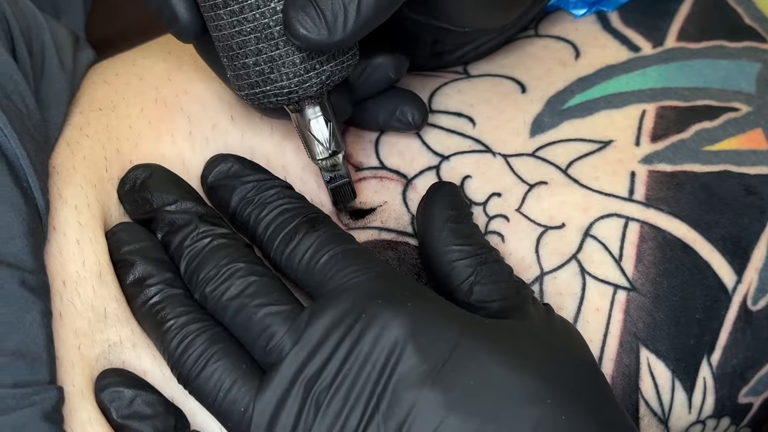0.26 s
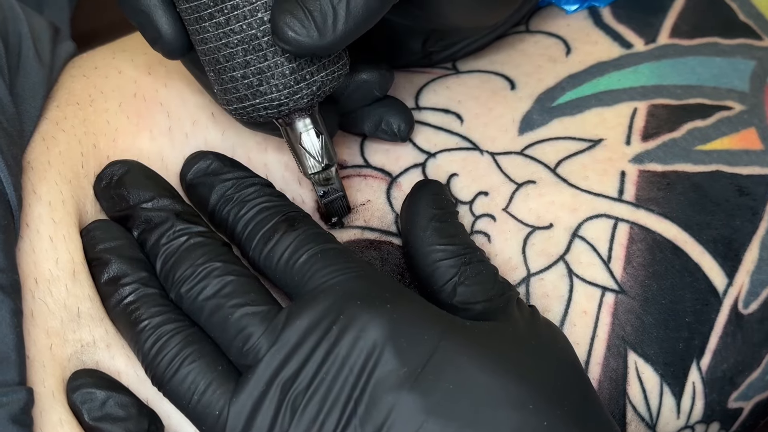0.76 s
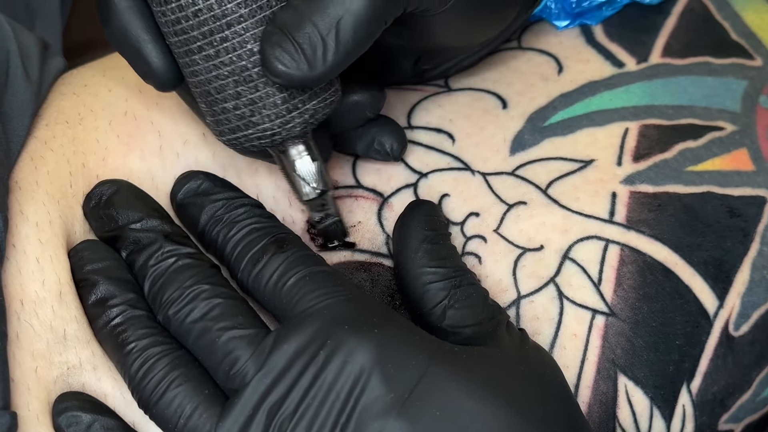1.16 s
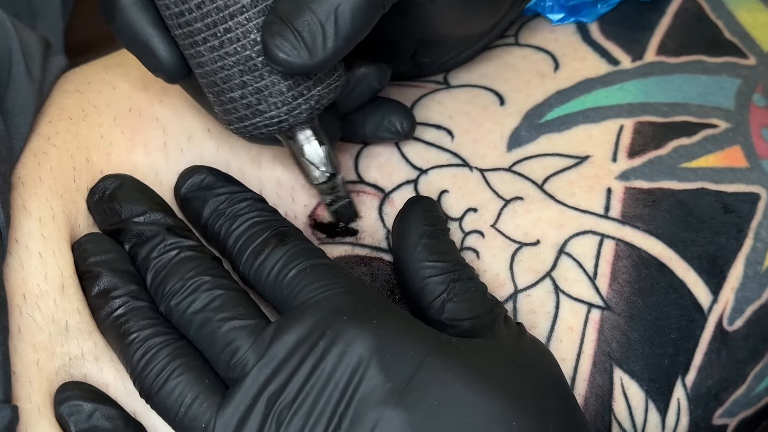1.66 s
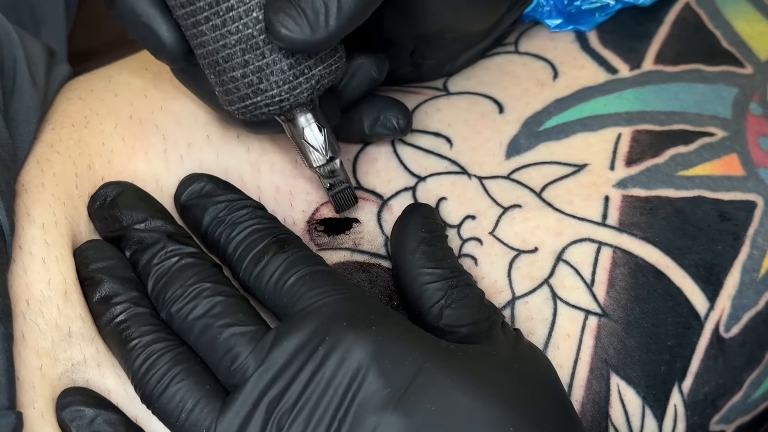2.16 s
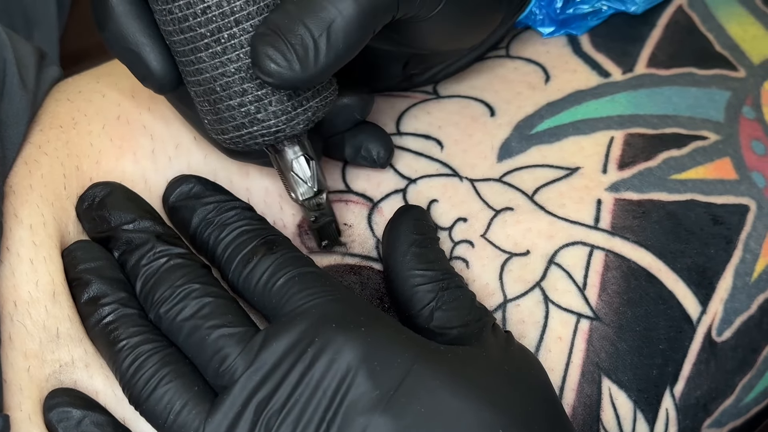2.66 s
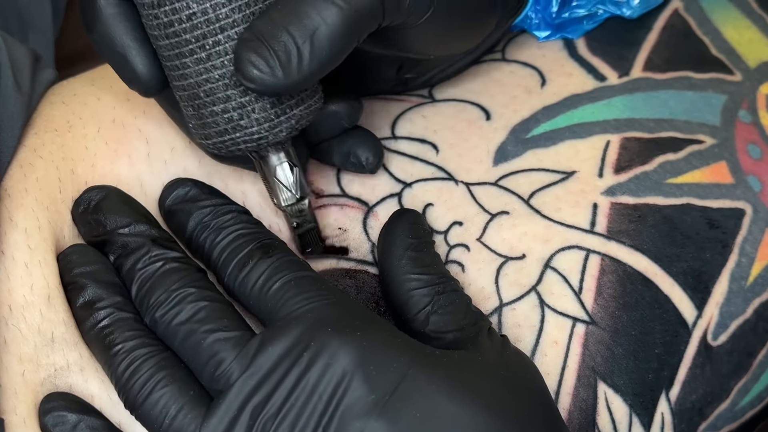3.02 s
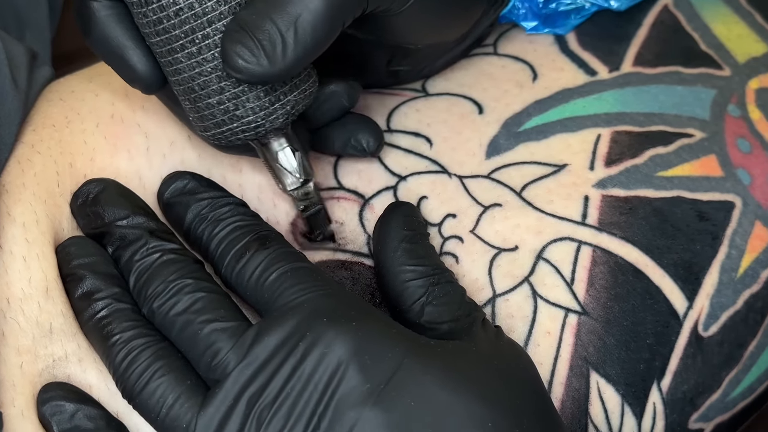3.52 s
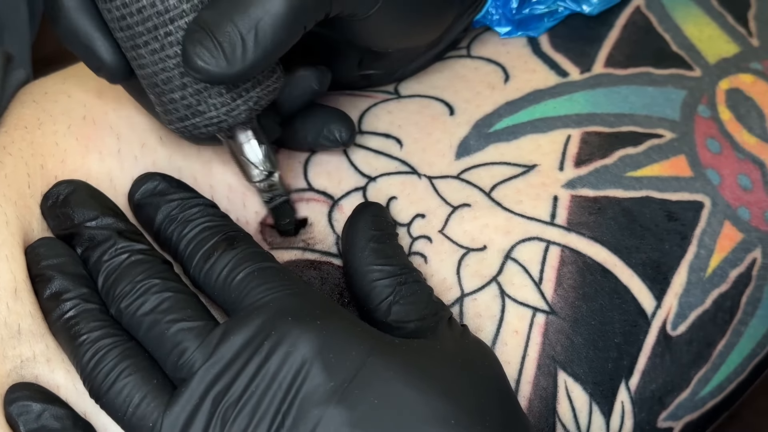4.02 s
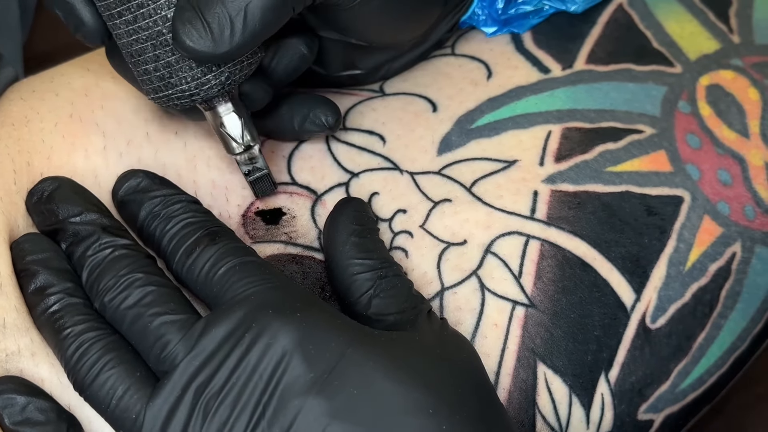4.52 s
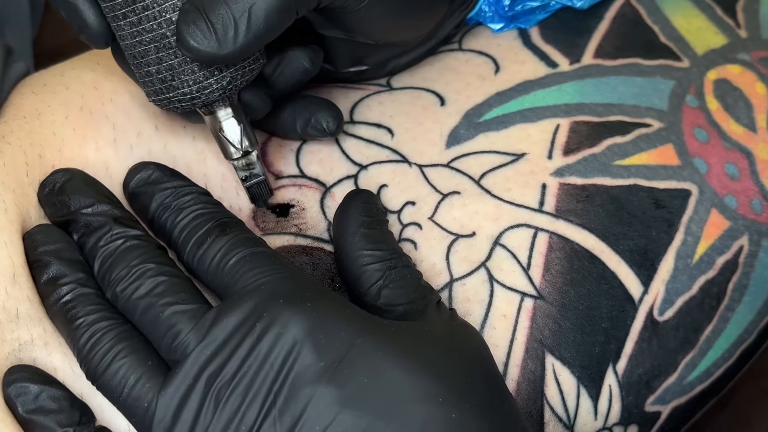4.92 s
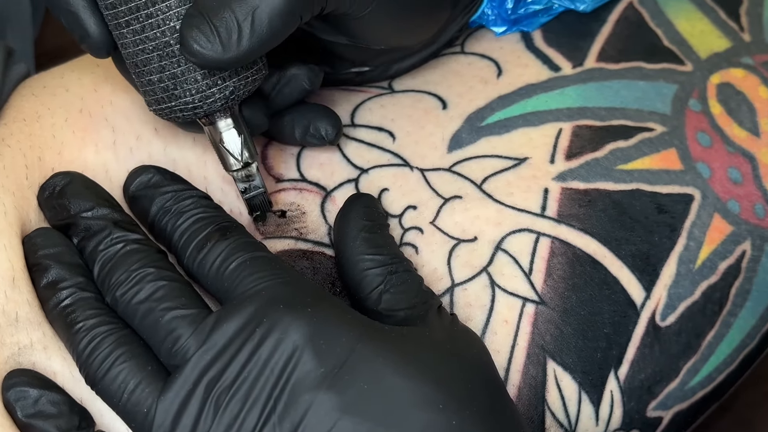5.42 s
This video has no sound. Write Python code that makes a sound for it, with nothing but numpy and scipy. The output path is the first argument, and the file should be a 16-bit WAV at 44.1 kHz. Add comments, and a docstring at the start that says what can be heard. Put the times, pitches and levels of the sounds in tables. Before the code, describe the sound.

A small rotary tattoo machine runs without pause, heard close and dry through a two-port stereo microphone in a quiet studio. Its rough drone repeats about 77 times a second, mixing nasal motor hum, metallic ringing chatter, dull knocks, a worn rub and bright bearing hiss. From 0 to 2 seconds the needles work the skin, the pitch wavering slightly with quick hand strokes and slowly sagging. Around 2.1 to 2.4 seconds the needles lift and the motor runs freer, a little higher and more open. It presses again until about 4.1, with one tiny sharp tick near 3.0. Another lift follows, then from about 4.55 it works to the end, steadier and tighter, at about 5.7. Farther off, a second machine buzzes thinly at a slightly higher, nearly even speed, fading after the start and swelling toward 4.3 seconds. Low room rumble and faint air lie underneath; the extreme treble is cut off.

```python
"""A rotary tattoo machine buzzes close to a two-port microphone in a quiet studio.
Its motor turns a cam about 77 times a second, slowing as the needles press into skin, running free when lifted.
Each turn repeats a hum of partials, ringing contacts, dull knocks and a worn rub, over bearing hiss.
Further off a second machine buzzes at a nearly even speed, swelling and fading, above the room's rumble."""
import sys
import numpy as np
from scipy import signal
from scipy.fft import rfft, irfft, next_fast_len
from scipy.io import wavfile
from scipy.ndimage import uniform_filter1d

SR = 44100
rng = np.random.default_rng(int(sys.argv[2]) if len(sys.argv) > 2 else 0)


def store_wav(level_fs):
    """Save 16-bit WAV to argv[1]."""
    pcm = np.round(np.clip(np.atleast_2d(level_fs), -1, 1) * 32767)
    wavfile.write(sys.argv[1], SR, pcm.T.astype(np.int16))


N = 250564   # length in samples

# Moments as shares of a turn: end of stroke, rebound, top of stroke, cartridge spring, approach
STRIKE, REBOUND, TOP, SPRING, APPROACH = .0, .15, .46, .69, .88

# Levels in the tables are relative unless marked otherwise; density_db is level per Hz.
# Room air and rumble: hz, density_db
ROOM_COLOUR = [(25, -11), (60, 0.5), (110, -1.5), (170, 3), (300, -1), (450, -6.5), (800, -4.5), (1400, -5),
               (2500, -11.5), (4000, -63)]
# Speed of the second machine: time_s, turns_per_s
NEIGHBOUR_SPEED = [(0, 87.66), (1.9, 87.69), (2.1, 87.56), (2.6, 87.6), (2.75, 87.875), (4.3, 87.865),
                   (4.6, 87.77), (5.68, 87.73)]
# Its buzz: time_s, buzz_db
NEIGHBOUR_BUZZ = [(0, -35), (.5, -49), (1.9, -46.5), (2.6, -40.5), (2.75, -38), (4.3, -33.5), (5.68, -39)]
# Its clear tones: multiple of the turn rate, level_db
NEIGHBOUR_PARTIALS = [(1, -54), (7, -65), (13, -84), (15, -65), (27, -65), (44, -54), (65, -70), (68, -48),
                      (80, -64), (124, -43)]
# Colour of its buzz: hz, density_db
BUZZ_COLOUR = [(1200, -40), (2500, -14), (4500, 1.5), (6000, 0.5), (8500, -0.5), (10800, -9), (13000, -4),
               (15800, 0)]
# How loud the near machine's parts arrive as the hand turns:
# time_s, hum_db, housing_rattle_db, cartridge_rattle_db, rasp_db
PART_LEVELS = [(0, -42.5, -40, -42, -47), (.3, -40, -38, -38.5, -55), (.65, -41.5, -36.5, -39.5, -63),
               (1.0, -41.5, -35.5, -39.5, -51), (1.5, -40, -36.5, -43, -45), (2.0, -41, -37.5, -45.5, -40),
               (2.2, -43.5, -38, -42, -36), (2.4, -42, -37, -46, -55), (2.67, -40.5, -36.5, -41, -64),
               (3.2, -40.5, -38.5, -43.5, -56), (3.95, -41, -40, -45, -43), (4.12, -41, -39.5, -51, -40),
               (4.25, -43.5, -39, -43, -37), (4.42, -42.5, -40.5, -52, -37), (4.6, -42, -40, -45, -42),
               (5.1, -40.5, -40.5, -42.5, -50), (5.68, -42.5, -37.5, -43, -43)]
# Hum of motor and grip when pressing: multiple of the turn rate, level_db
PRESSED_PARTIALS = [(1, -6.5), (2, -6.5), (3, -8.5), (4, -23), (5, -18.5), (6, -20.5), (7, -14.5),
                    (8, -12.5), (9, -3), (10, -8), (11, -9.5), (12, -20.5), (13, -17.5), (14, -37),
                    (15, -6), (16, -19.5), (17, -4.5), (18, -12.5), (19, -8), (20, 7.5), (21, -2), (22, -8),
                    (23, -2), (24, -11.5), (25, -14.5), (26, -18), (27, -4.5), (28, -24), (29, -5),
                    (30, -31), (31, -6), (32, -15), (33, -10.5), (34, -37), (35, -5.5)]
# Hum of motor and grip when lifted: multiple of the turn rate, level_db
FREE_PARTIALS = [(1, -8.5), (2, -6.5), (3, -6.5), (4, -26), (5, -20), (6, -16), (7, -15), (8, -11), (9, -8),
                 (10, -14.5), (11, -8.5), (12, -22), (13, -17), (14, -32), (15, -5), (16, -15), (17, 0),
                 (18, -2.5), (19, -30), (20, -3), (21, -14), (22, 2), (23, -1), (24, -14), (25, -29),
                 (26, -7), (27, -4.5), (28, -17), (29, -6.5), (30, -19), (31, -10), (32, -27), (33, -20),
                 (34, -28), (35, -37)]
# Partials that change as the hand bears down harder: {multiple: db per Hz of further slowing}
HARD_PRESS_CHANGE = {19: -4.4, 20: -0.79, 22: 5.1, 24: 5.4, 25: 7.6, 27: -2.5, 28: 1.2, 31: 1.2}
# Partials that change with the new grip angle while pressing: {multiple: change_db}
TILTED_GRIP_CHANGE = {19: -3.0, 20: -7.0, 21: 1.0, 22: 3.0, 23: 3.0}
# Contacts of cam, bar and needles in a turn: share_of_turn, lifted_db, pressed_db
DRIVE_CONTACTS = [(.0, -1.5, 3), (0.081, 3.5, 1), (0.169, 0, 4), (.4, 0.5, 2), (.5, 0.5, 2.5),
                  (0.581, 6, -32), (0.682, -1.5, -5), (0.809, 2.5, -0.5), (.87, 3, 7.5)]
# Resonances of housing and cartridge that the contacts ring: hz, width_hz, lifted_db, pressed_db
BODY_RESONANCES = [(3440, 420, -5.5, -18.5), (4170, 250, -5, -39), (4390, 142, -1.5, 0), (4603, 93, 1, 1),
                   (5100, 270, -2, -6), (6074, 150, -3, -4.5), (6850, 120, -1.5, 0.5), (6854, 80, 7, -7),
                   (9220, 126, 3, -5)]
# Blows on grip and cartridge: hz, width_hz, moment (share of a turn), lifted_db, pressed_db
BLOWS = [(1743, 232, STRIKE, -14.5, -12.5), (3070, 580, STRIKE, -5.5, -4.5),
         (3790, 617, APPROACH, -3, -15.5), (3530, 536, REBOUND, -8, -3), (4000, 494, APPROACH, -3, -11),
         (2405, 508, STRIKE, -20, -11.5), (5580, 900, TOP, -19, -9.5), (6800, 397.4, SPRING, 0, -3)]
# Bearing and needle friction: hz, density_db
HISS_COLOUR = [(700, -28), (1200, -18.5), (1700, 1), (2650, -6), (3150, -2.5), (3800, -5.5), (4550, 1.5),
               (5500, -1.5), (6800, -1.5), (7600, -4), (9400, -12.5), (10800, 2), (12500, -5.5),
               (15800, -18)]
# The rub that repeats every turn: hz, density_db
RUB_COLOUR = [(1500, -26), (2650, -13), (3100, -9), (3800, -24), (4150, -11.5), (4400, -3), (4620, 4),
              (4850, -5.5), (5600, -10), (6800, -3), (7600, -10), (9500, -6), (12000, -17), (15800, -7)]
# Swells of rattle and friction: low_hz, high_hz, burst over the steady part (ratio), moments (shares of a turn)
BURST_BANDS = [(0, 2800, .6, [STRIKE, TOP]), (2800, 3500, .5, [STRIKE]), (3500, 4200, .8, [APPROACH, TOP]),
               (4200, 4900, .5, [REBOUND, TOP]), (4900, 6300, 1.3, [TOP]), (6300, 7700, 1.2, [SPRING]),
               (7700, 9000, .8, [REBOUND + .1, APPROACH - .08]), (9000, 10200, 1.0, [SPRING]),
               (10200, 23000, 1.0, [STRIKE])]
# Sharper snaps of the needle bar: start_s, burst_peak_db (before its ring is added)
SNAPS = [(2.9725, -18)]
# Passes over the skin: touch_s, lift_s, mean speed at touch_hz, at lift_hz,
# swing of the speed with each sweep at touch_hz, at lift_hz
NEEDLE_PASSES = [(-.2, 2.046, 77.8, 75.8, .25, .36), (2.396, 4.098, 76.86, 75.66, .31, .53),
                 (4.547, 5.9, 77.5, 77.1, .22, .12)]
# The hand's to-and-fro, pushing hardest at whole counts: time_s, sweeps so far
HAND_SWEEPS = [(-.108, -1), (.246, 0), (.724, 2), (.865, 3), (2.034, 9), (2.672, 12), (3.97, 18),
               (4.629, 21), (4.829, 22), (5.28, 24), (5.56, 25), (5.84, 26)]
# How unsteadily the drive runs: time_s, looseness 0-1
LOOSENESS = [(0, .8), (2.1, 1), (2.45, 1), (2.6, .55), (4.1, .5), (4.2, 0), (5.68, .05)]
# Phase between the ports: hz, left lead in half turns of phase
PORT_LEAD = [(0, 0), (400, .08), (950, .05), (1250, .1), (1500, .7), (1800, .1), (2400, .05), (3000, .23),
             (3400, .2), (3600, 0), (6200, 0), (6900, .25), (7350, 1), (7600, 1), (8000, 1.87), (8300, 2),
             (8800, 1.97), (9100, 1.75), (10100, 1.25), (10500, 1), (11700, 1), (12300, .88), (12600, .58),
             (13200, .2), (13800, 0), (15000, 0), (15600, .1)]
# Level between the ports: hz, left_minus_right_db
PORT_TILT = [(100, -.5), (400, 0), (750, 2), (1250, 1.5), (1550, -7), (2000, -2.5), (2400, 0), (15000, 0)]

FREE_HZ, LIGHT_HZ, PRESSED_HZ = 78.9, 77.5, 76.3   # turns a second: lifted, needles fully in, working
SINK_S, LIFT_S = .107, .088   # time to sink in and to come clear
PUSH_HUM_DB, PUSH_HOUSING_DB, PUSH_CARTRIDGE_DB = -0.5, -0.2, -0.4   # change at the hardest push
TILT_S = 4.3   # the grip is held at a new angle from here on
LOW_SPREAD, HIGH_SPREAD = 1.45, .07   # phase of low and upper partials, radians per multiple squared
STUDIO_DB, HISS_DB, RUB_DB = -49.5, -38.5, -37   # base levels
HUM_DB, RATTLE_DB, KNOCK_DB, SCATTER_DB = -46.5, 31.5, 2.0, 3.5   # mix gains
RATTLE_SPREAD_DB, KNOCK_SPREAD_DB, HISS_FLICKER_DB = 2.2, 1.3, .9   # chance in contacts, blows and hiss
WOBBLE, LOOSE_HISS_DB = .0016, 2.0   # slip (share of a turn) at full looseness; hiss rise from tight to loose
CONTACT_JITTER, PATH_LAG = .0006, .01   # scale of the timing scatter, shares of a turn
RUB_SLIP, RUB_TURNS = .0008, 3.5   # slip against the cam (share of a turn); turns until the roughness is new
CARTRIDGE_HZ = 6300   # resonances above this belong to the cartridge
RASP_LOW_HZ, RASP_HIGH_HZ = 3400, 4200   # blows in this range follow the rasp
BURST_SHARP = 7.0   # larger is shorter
TICK_HZ, TICK_WIDTH_HZ, TICK_DECAY_S, TICK_RING_DB = 12300, 290, 0.001, 19
CUTOFF_HZ = 15780


def from_db(db):
    """Turns decibels into an amplitude factor."""
    return 10 ** (np.asarray(db) / 20)


def rms_one(x):
    """Scales a signal to rms 1."""
    return x / np.sqrt(np.mean(x ** 2) + 1e-20)


def at_hz(points, hz):
    """Reads a curve over pitch on a log-frequency axis."""
    p = np.array(points, float)
    return np.interp(np.log(hz + 1), np.log(p[:, 0] + 1), p[:, 1])


def in_time(rows):
    """Draws each column of a time table as a curve, one value a sample."""
    s, *columns = np.transpose(rows)
    return [np.interp(np.arange(N) / SR, s, c) for c in columns]


def bin_hz(size):
    """Pitch of each spectrum bin."""
    return np.arange(size // 2 + 1) * SR / size


def drift(rate_hz):
    """Slow random wander of spread 1: noise through two equal low-pass poles, made at 1/40 of the rate."""
    r = np.exp(-80 * np.pi * rate_hz / SR)
    noise = rng.standard_normal(N // 40 + 2002)
    slow = rms_one(signal.lfilter([1], [1, -2 * r, r * r], noise)[2000:])
    return np.interp(np.arange(N) / 40, np.arange(len(slow)), slow)


def coloured(x, spectrum):
    """Shapes a signal with a density curve, then sets it to rms 1."""
    size = next_fast_len(N)
    gain = from_db(at_hz(spectrum, bin_hz(size)))
    return rms_one(irfft(rfft(x, size) * gain, size)[..., :N])


def coloured_noise(spectrum, channels):
    """Unrelated noise in each channel, shaped to a colour."""
    return coloured(rng.standard_normal((channels, N)), spectrum)


def ring(clicks, hz, width):
    """One resonance: a two-pole band-pass that rings longer the narrower it is."""
    r = np.exp(-np.pi * width / SR)
    edge = (1 - r * r) / 2
    poles = [1, -2 * r * np.cos(2 * np.pi * hz / SR), r * r]
    return signal.lfilter([edge, 0, -edge], poles, clicks + 1e-18)


def worn_surfaces(turns, lasts, colour):
    """The same roughness passes every turn, so the rub repeats; one pattern melts into the next over some turns."""
    patterns = rng.standard_normal((200, 512))
    place = (turns % 1 * 512).astype(int)
    age = np.clip(turns / lasts, 0, 198)
    older, blend = age.astype(int), np.pi / 2 * (age % 1)
    rub = np.cos(blend) * patterns[older, place] + np.sin(blend) * patterns[older + 1, place]
    return coloured(rub, colour)


def studio():
    """Air and distant rumble: shared noise, alike at both ports in the bass, with a mid-range difference."""
    mid, side = coloured_noise(ROOM_COLOUR, channels=2)
    side = signal.lfilter(*signal.butter(1, [350, 1500], "band", fs=SR), side)
    return from_db(STUDIO_DB) * (mid + 0.76 * side * [[1], [-1]])


def neighbour():
    """The second machine: a thin buzz of repeating roughness with a few clear tones locked to its turns."""
    (speed,), (buzz_db,) = in_time(NEIGHBOUR_SPEED), in_time(NEIGHBOUR_BUZZ)
    turns = np.cumsum(speed) / SR
    tones = 0
    for k, db in NEIGHBOUR_PARTIALS:
        follow_db = (buzz_db - buzz_db.max()) * (k > 1)   # all but the fundamental follow the buzz
        level = from_db(db + 1.7 * drift(1.7) + follow_db)
        tones = tones + level * np.sin(2 * np.pi * k * turns + k)
    return tones + from_db(buzz_db) * worn_surfaces(turns, lasts=58.6, colour=BUZZ_COLOUR)


def hiss(loose):
    """Bearing and needle friction: two unrelated noises that flicker together, louder when the drive is loose."""
    level_db = HISS_DB + LOOSE_HISS_DB * (loose - 0.5) + HISS_FLICKER_DB * drift(16.0)
    return from_db(level_db) * coloured_noise(HISS_COLOUR, channels=2)


def cam_rub(turns, housing_db):
    """Worn parts rub with the same roughness each turn, slipping slightly against the cam."""
    level_db = RUB_DB + 0.5 * (housing_db - housing_db.mean()) + .5 * drift(16.0)
    return from_db(level_db) * worn_surfaces(turns + RUB_SLIP * drift(40.0), RUB_TURNS, RUB_COLOUR)


def ticks():
    """The needle bar snaps: a short bright burst of noise with a high ring."""
    out = np.zeros(N)
    for s, peak_db in SNAPS:
        fade = np.exp(-np.arange(200) / (TICK_DECAY_S * SR))
        burst = np.diff(rng.standard_normal(200) * fade, prepend=0)
        start = round(s * SR)
        out[start:start + 200] += from_db(peak_db) * burst / np.abs(burst).max()
    return out + from_db(TICK_RING_DB) * ring(out, TICK_HZ, TICK_WIDTH_HZ)


def knock(turns, load, grip_db, cartridge_db, rasp_db):
    """One dull blow a turn into each broad resonance of grip and cartridge."""
    whole, out = np.arange(int(turns[-1])), 0
    for hz, width, share, lifted_db, pressed_db in BLOWS:
        rise = PRESSED_HZ / (np.pi * width)   # strike early: the ring peaks this share of a turn later
        angle = whole + share - rise + CONTACT_JITTER * rng.standard_normal(len(whole))
        at = np.clip(np.searchsorted(turns, angle), 0, N - 1)
        if hz > CARTRIDGE_HZ:
            part_db = cartridge_db
        elif RASP_LOW_HZ < hz < RASP_HIGH_HZ:
            part_db = rasp_db
        else:
            part_db = grip_db
        db = lifted_db + load[at] * (pressed_db - lifted_db) + part_db[at]
        clicks = np.zeros(N)
        clicks[at] = from_db(db + KNOCK_SPREAD_DB * rng.standard_normal(len(at)))
        out = out + ring(ring(clicks, hz, width), hz, width)   # rung twice: steep skirts
    return out


def rattle(turns, load, housing_db, cartridge_db):
    """Each contact clicks once a turn, early or late, reaching each resonance by its own path, never equally hard."""
    whole = np.arange(int(turns[-1]) + 1)
    share, free_db, pressed_db = np.transpose(DRIVE_CONTACTS)[:, :, None]
    wander = rng.standard_normal((len(DRIVE_CONTACTS), len(whole)))
    wander = uniform_filter1d(wander, size=8) * np.sqrt(8)   # drifts over several turns
    angle = whole + share + CONTACT_JITTER * (wander + 0.82 * rng.standard_normal(wander.shape))
    out = 0
    for k, (hz, width, lifted_db, working_db) in enumerate(BODY_RESONANCES):
        path = PATH_LAG * rng.standard_normal(share.shape)
        at = np.clip(np.searchsorted(turns, angle + path), 0, N - 1)
        lifted = free_db + lifted_db
        db = lifted + load[at] * (pressed_db + working_db - lifted)
        db = db + (cartridge_db if hz > CARTRIDGE_HZ else housing_db)[at]
        clicks = np.zeros(N)
        np.add.at(clicks, at, from_db(db + RATTLE_SPREAD_DB * rng.standard_normal(at.shape)))
        clicks[-1] = 0   # drop contacts past the end
        out = out + (-1) ** k * ring(clicks, hz, width)
    return out


def in_bursts(x, turns):
    """Rattle and friction swell briefly, each range of pitch at its own moments of every turn."""
    size = next_fast_len(N)
    hz, spectrum, out = bin_hz(size), rfft(x, size), 0
    for low, high, depth, moments in BURST_BANDS:
        pulses = sum(np.exp(BURST_SHARP * (np.cos(2 * np.pi * (turns - m)) - 1)) for m in moments)
        band = irfft(spectrum * (hz >= low) * (hz < high), size)[:, :N]
        out = out + rms_one(1 + depth * pulses) * band
    return out


def hum(turns, speed, level_db):
    """Wavering partials locked to the turns; pressing shifts their balance, and the upper ones bunch in each turn."""
    touching = np.clip((FREE_HZ - speed) / (FREE_HZ - LIGHT_HZ), 0, 1)
    slowed_hz = np.maximum(LIGHT_HZ - speed, 0)
    tilted = touching * (np.arange(N) > TILT_S * SR)
    out = 0
    for (k, pressed_db), (_, free_db) in zip(PRESSED_PARTIALS, FREE_PARTIALS):
        db = free_db + touching * (pressed_db - free_db)
        db = db + HARD_PRESS_CHANGE.get(k, 0) * slowed_hz + TILTED_GRIP_CHANGE.get(k, 0) * tilted
        db = db + 1.5 * drift(7.7) + level_db * (k > 12)   # only the upper partials follow the hand's turning
        lag = HIGH_SPREAD * (k - 22) ** 2 if k > 14 else LOW_SPREAD * k * k * (k > 3)
        out = out + from_db(db) * np.cos(2 * np.pi * k * turns + lag + .35 * drift(5.9))
    return out


def hand():
    """Motor speed under the working hand, and the push of each sweep (-1 to 1, nil when lifted)."""
    t, (count,) = np.arange(N) / SR, in_time(HAND_SWEEPS)
    sweep, speed, push = np.cos(2 * np.pi * count), np.full(N, FREE_HZ), 0
    for touch, lift, first_hz, last_hz, first_swing, last_swing in NEEDLE_PASSES:
        along = np.clip((t - touch) / (lift - touch), 0, 1)
        contact = np.clip((t - touch) / SINK_S, 0, 1) * np.clip(1 - (t - lift) / LIFT_S, 0, 1)
        swing = first_swing + along * (last_swing - first_swing)
        working = first_hz + along * (last_hz - first_hz) - sweep * swing
        speed = speed + contact * (working - FREE_HZ)
        push = push + contact * sweep
    return speed, push


def ports(near, scattered):
    """Two ports hear with pitch-dependent phase and level; sound scattered by the hands differs between them."""
    size = next_fast_len(N + 4096)
    hz = bin_hz(size)
    lead, tilt = np.pi * at_hz(PORT_LEAD, hz), from_db(at_hz(PORT_TILT, hz) / 2)
    # scatter is strongest between the in-phase and opposite-phase bands
    arriving = rfft(near, size) + np.abs(np.sin(lead)) * rfft(scattered, size) * [[1], [-1]]
    port_response = np.array([tilt * np.exp(.5j * lead), np.exp(-.5j * lead) / tilt])
    return irfft(arriving * port_response, size)[:, :N]


def scene():
    """Both machines through the two ports, in the room."""
    speed, push = hand()
    hum_db, housing_db, cartridge_db, rasp_db = in_time(PART_LEVELS)
    hum_db = hum_db + PUSH_HUM_DB * push
    housing_db = housing_db + PUSH_HOUSING_DB * push
    cartridge_db = cartridge_db + PUSH_CARTRIDGE_DB * push
    loose, = in_time(LOOSENESS)
    turns = np.cumsum(speed) / SR + WOBBLE * loose * drift(18.0)
    load = np.clip((FREE_HZ - speed) / (FREE_HZ - PRESSED_HZ), 0, 1.3)   # pressing slows the motor

    grip_db = hum_db - hum_db.mean()
    motor = from_db(HUM_DB) * hum(turns, speed, grip_db)
    blows = from_db(KNOCK_DB) * knock(turns, load, grip_db, cartridge_db - cartridge_db.mean(),
                                      rasp_db - rasp_db.max())
    chatter = from_db(RATTLE_DB) * rattle(turns, load, housing_db, cartridge_db)
    direct, scattered = hiss(loose)
    direct = chatter + cam_rub(turns, housing_db) + direct
    direct, scattered = in_bursts(np.array([direct, scattered]), turns)
    near = motor + blows + direct + ticks() + neighbour()
    return ports(near, from_db(SCATTER_DB) * scattered) + studio()


def record(dry):
    """A steep elliptic low-pass cuts off the top of the treble."""
    return signal.sosfilt(signal.ellip(12, .5, 70, CUTOFF_HZ, fs=SR, output="sos"), dry)


dry = scene()
out = record(dry)
store_wav(out)
```